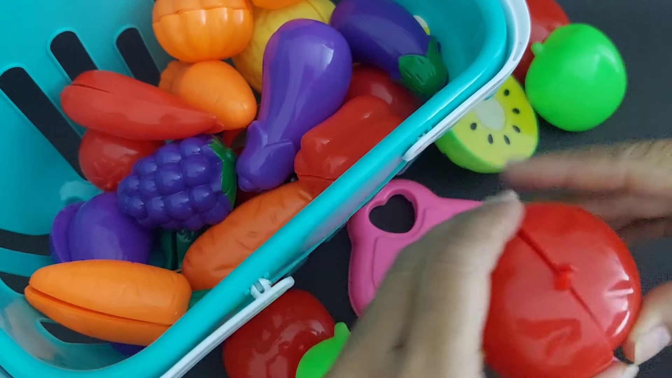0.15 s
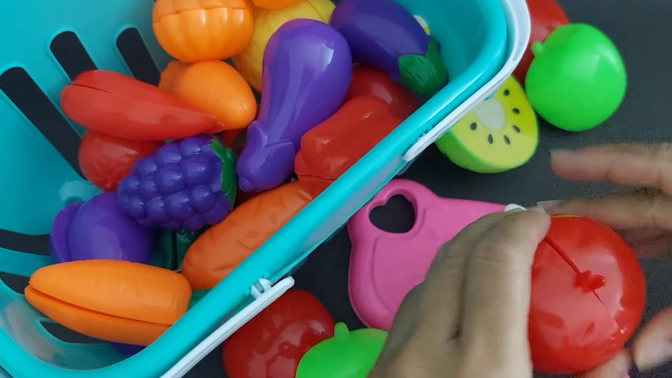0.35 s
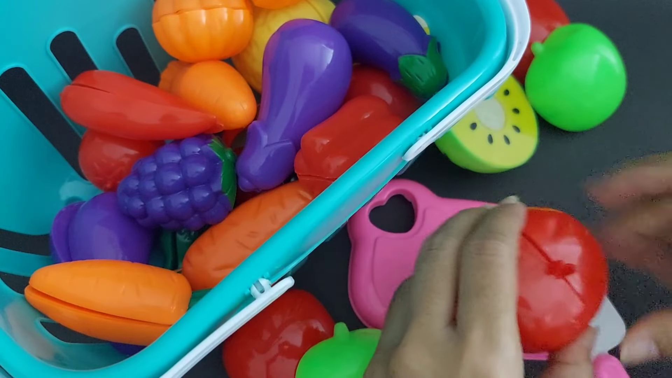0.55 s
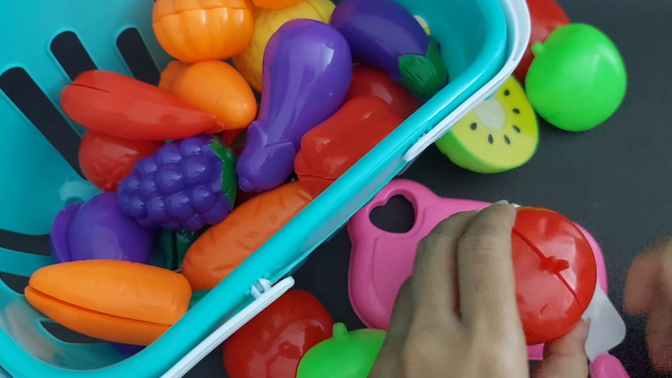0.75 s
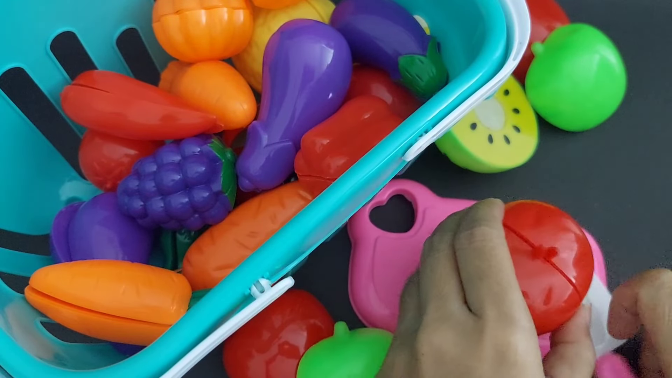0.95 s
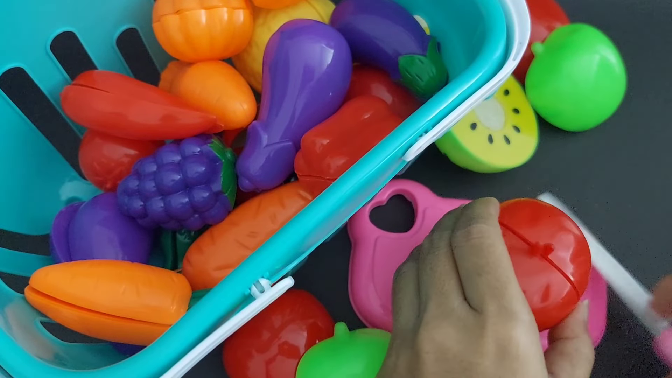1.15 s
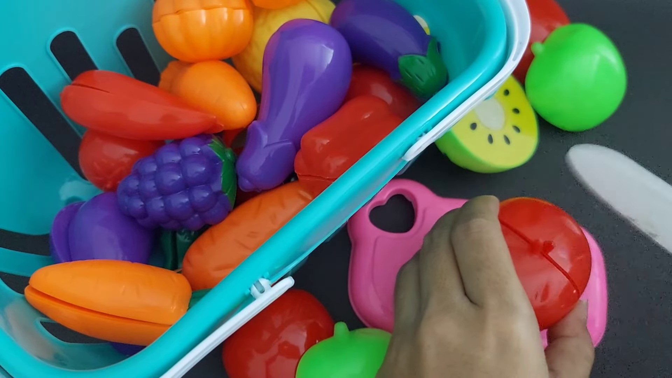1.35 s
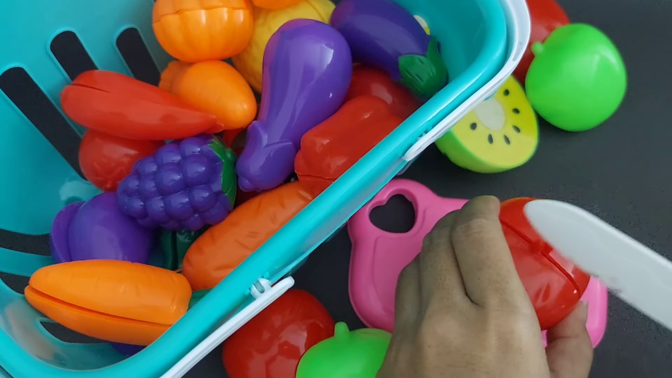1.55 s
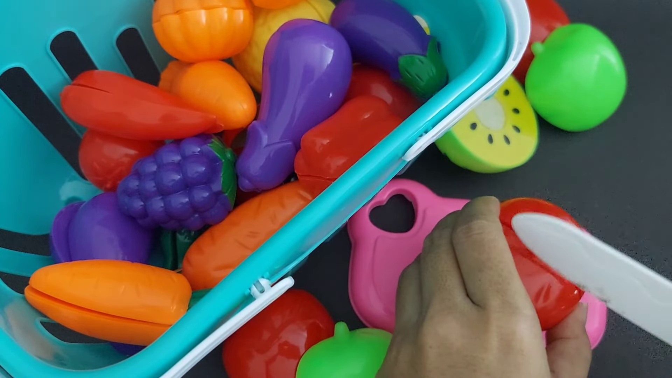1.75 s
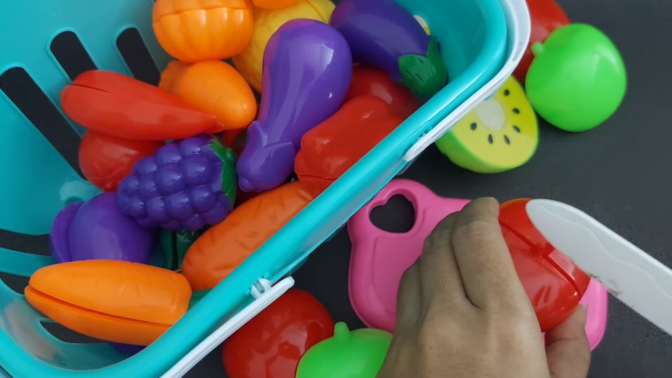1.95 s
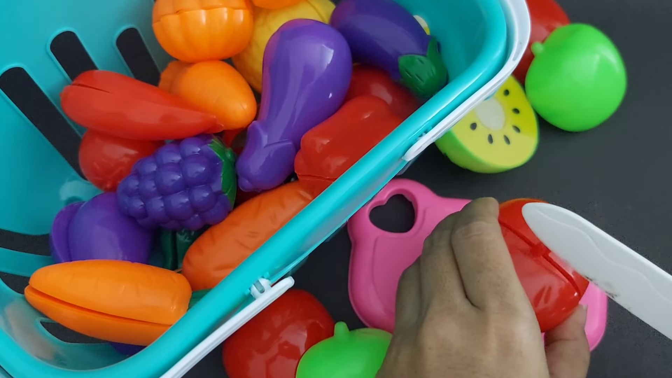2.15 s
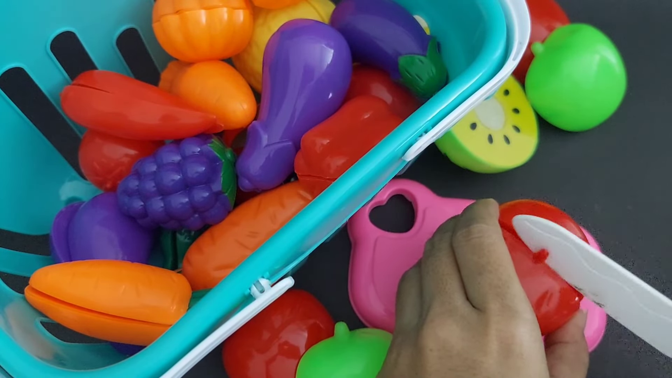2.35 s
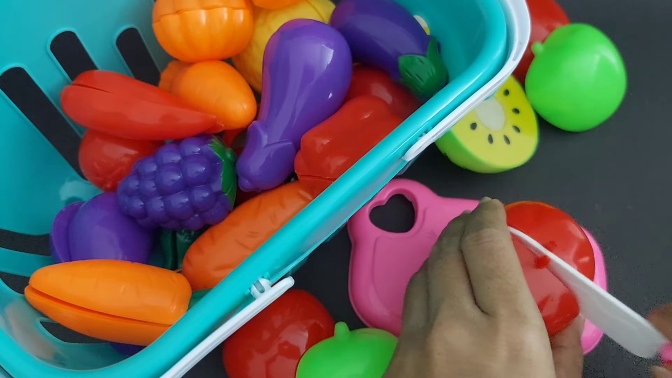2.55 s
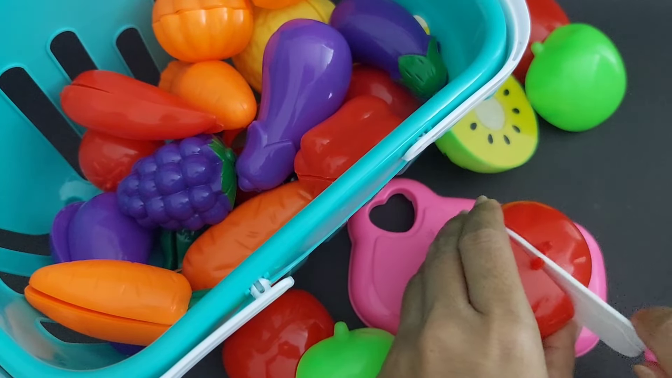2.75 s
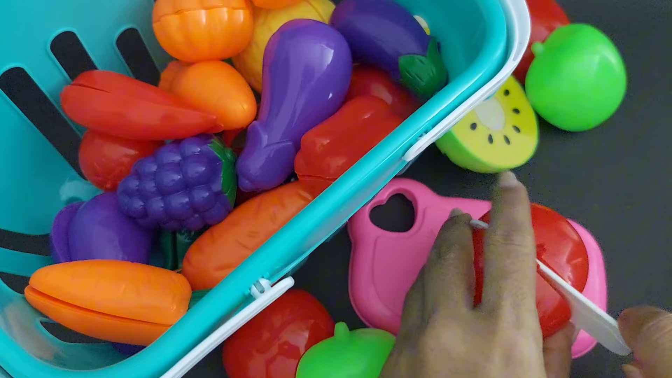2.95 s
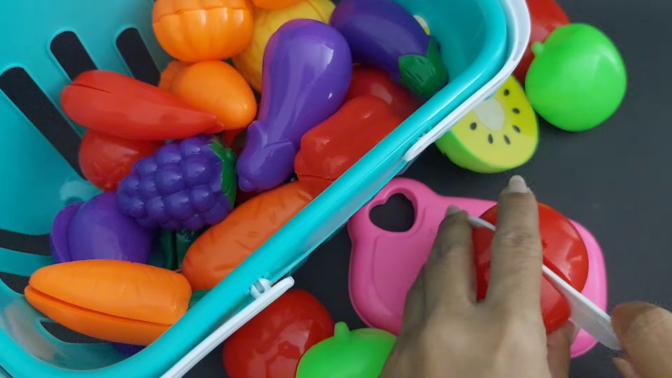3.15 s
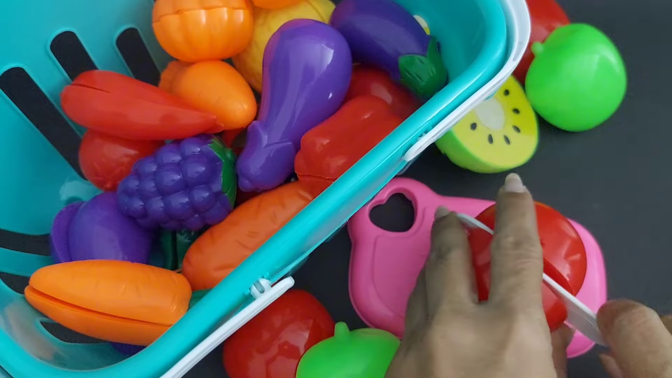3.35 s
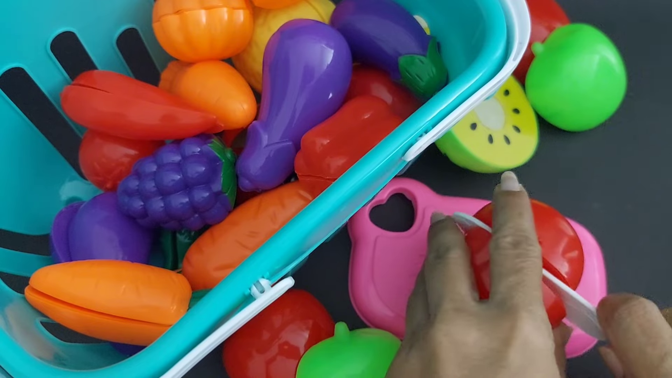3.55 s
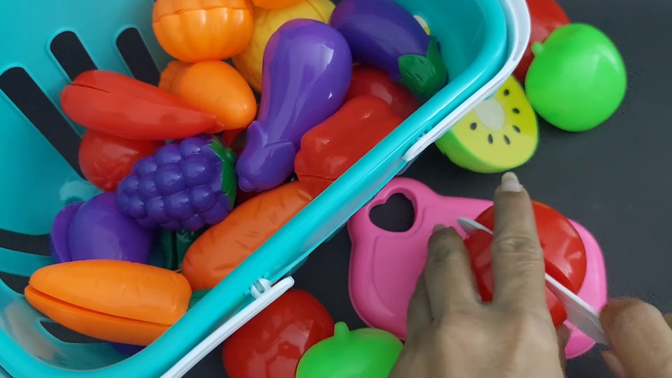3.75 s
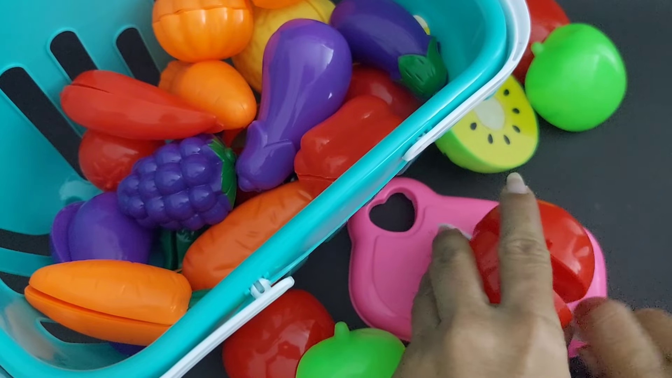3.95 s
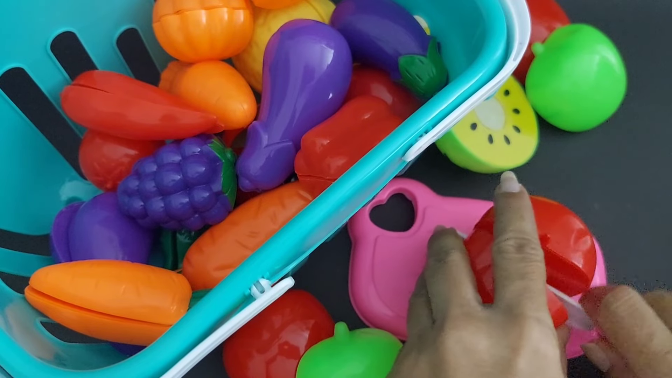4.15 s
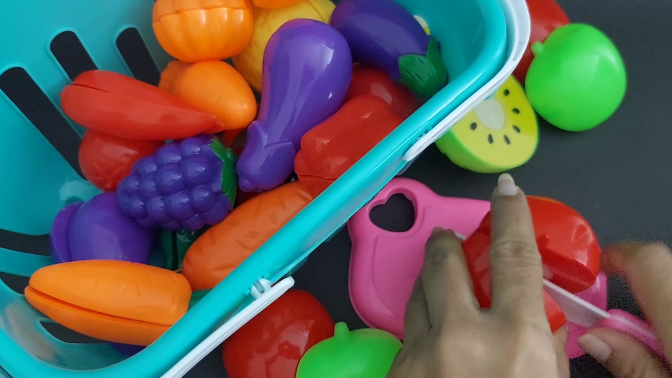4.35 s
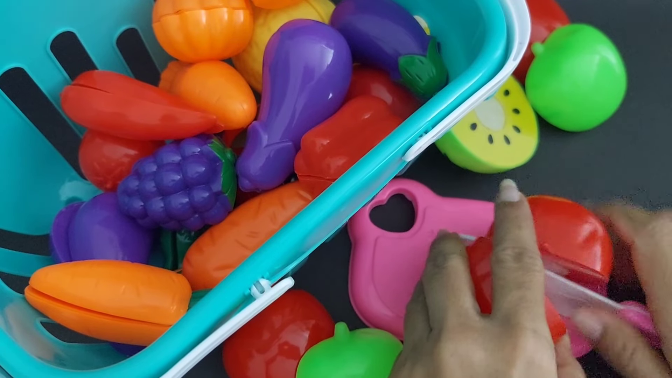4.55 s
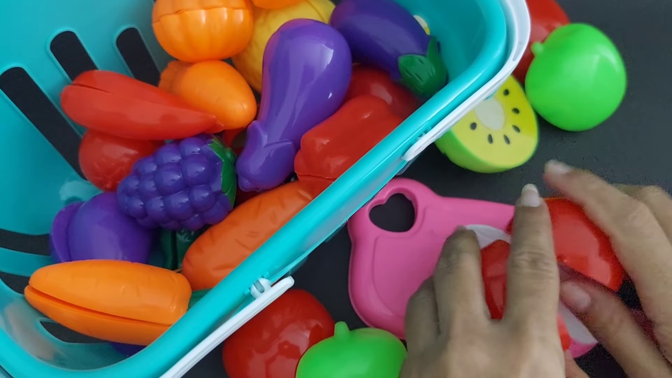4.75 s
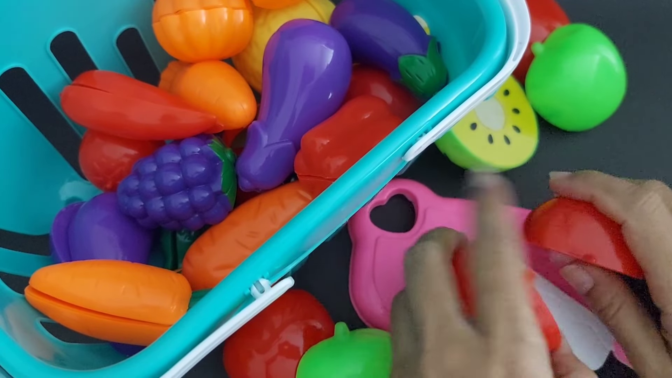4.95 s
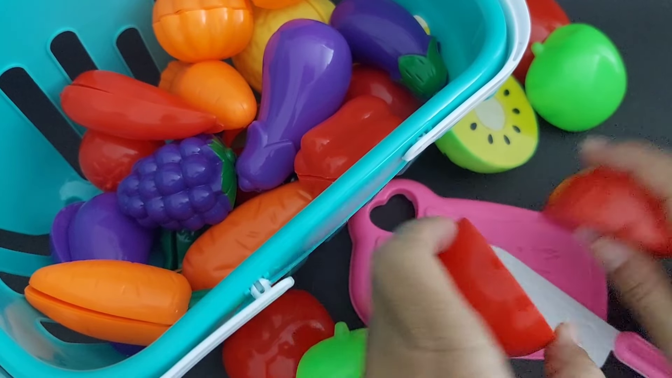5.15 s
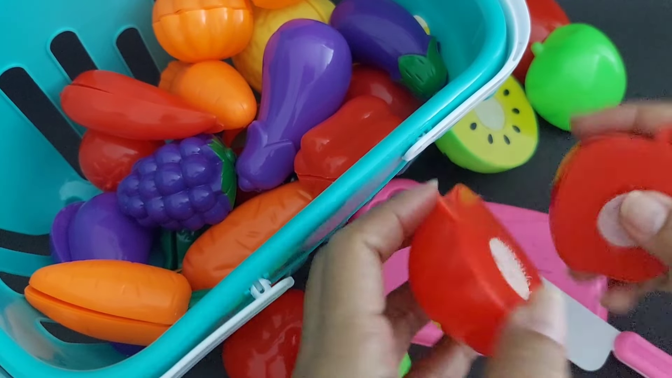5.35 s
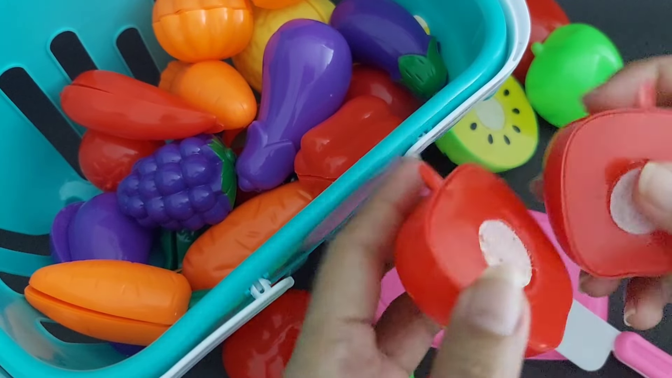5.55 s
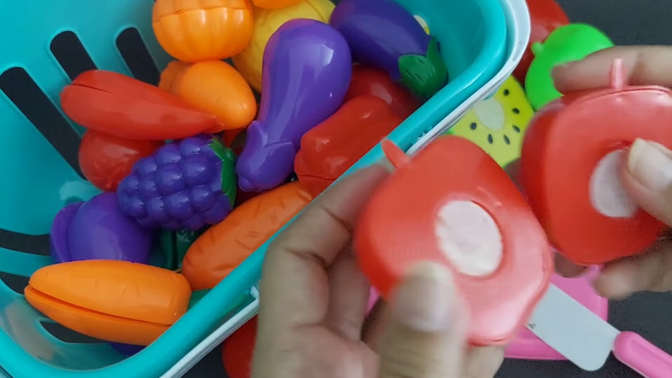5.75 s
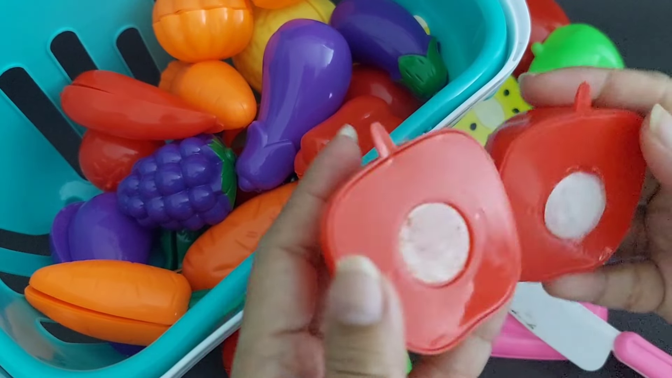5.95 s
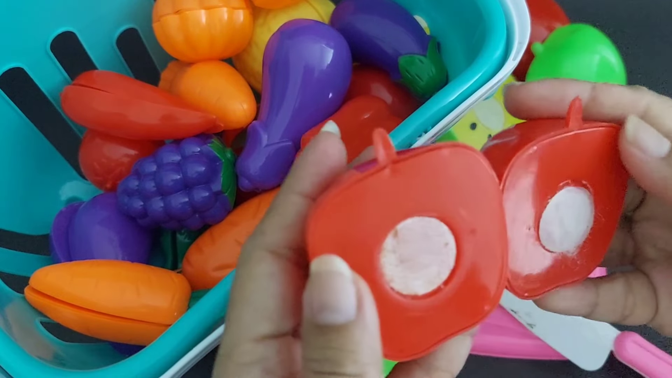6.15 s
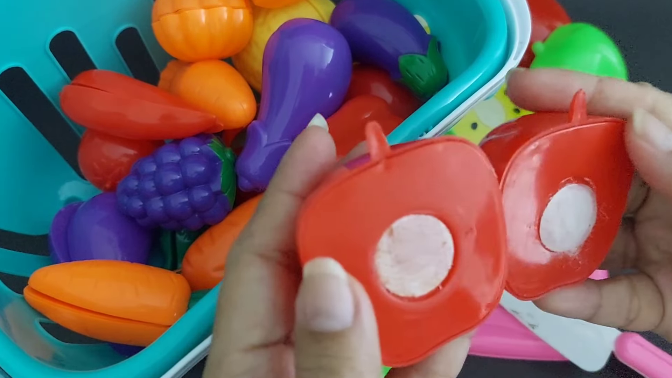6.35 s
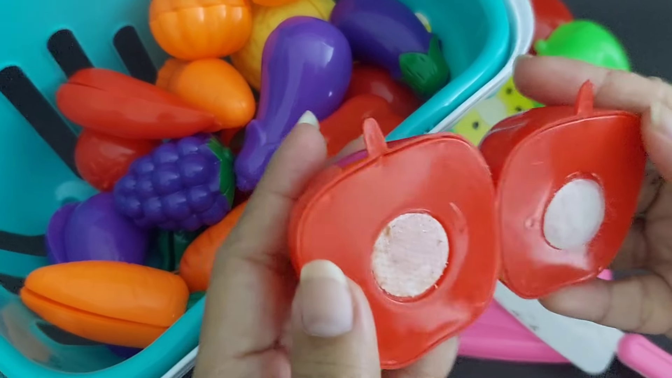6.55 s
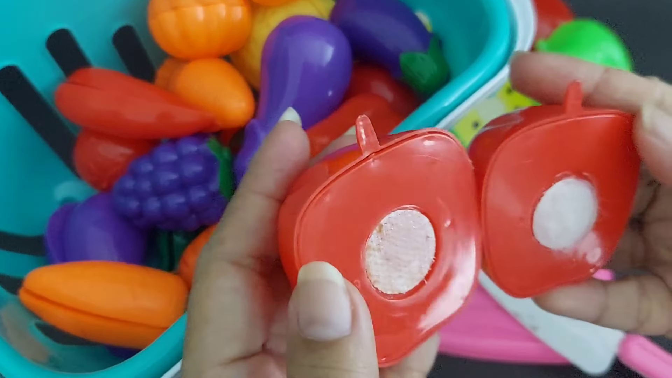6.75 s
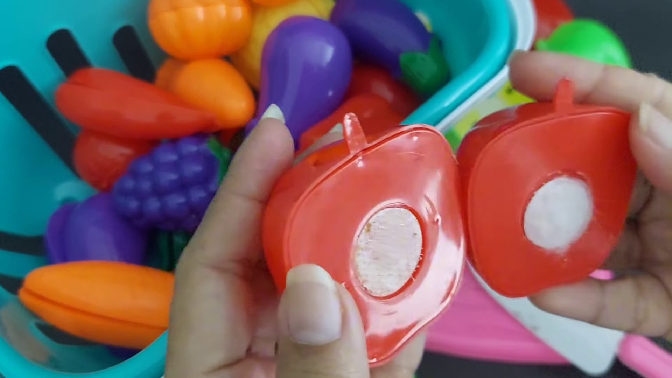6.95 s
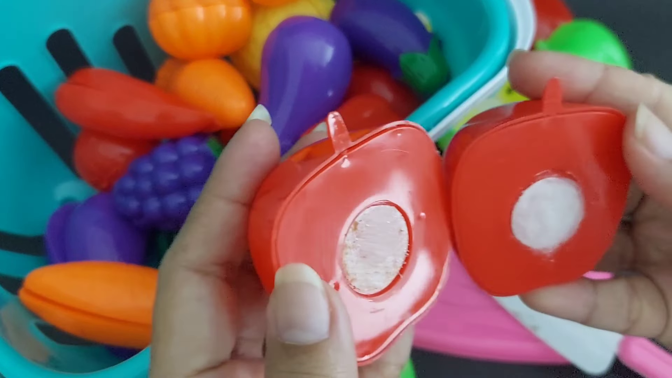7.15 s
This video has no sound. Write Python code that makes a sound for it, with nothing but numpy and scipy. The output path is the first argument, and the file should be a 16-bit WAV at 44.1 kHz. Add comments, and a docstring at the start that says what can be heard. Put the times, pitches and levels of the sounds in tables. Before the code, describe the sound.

Hook-and-loop crackles, then tears apart as a hollow plastic toy fruit is cut, with light taps, skin brushes and knocks on a board.

```python
"""Over the low rumble of a small, live room, skin brushes a hollow plastic toy fruit, close in stereo.
Nails and a plastic knife rasp and tap on its shell; the table booms softly and the fruit scuffs, knocks
and slides on a toy board. From 2.5 s the knife leans on the hook-and-loop patch between the halves,
which lets go hook by hook, then rips open at 3.9 s. A half slides and knocks on the board, the knife
drops near 5 s, and a few light brushes of skin end the scene."""
import sys
import numpy as np
from scipy import signal
from scipy.fft import rfft, irfft, next_fast_len
from scipy.io import wavfile

SR = 44100
rng = np.random.default_rng(int(sys.argv[2]) if len(sys.argv) > 2 else 0)


def wav_out(sig):
    """Save sig, one row per channel (or a flat mono array), as 16-bit PCM at SR to the path in sys.argv[1]."""
    wavfile.write(sys.argv[1], SR, np.round(np.clip(np.atleast_2d(sig).T, -1, 1) * 32767).astype(np.int16))


N = 317512


def from_db(db):
    """Decibels to gain."""
    return 10 ** (np.asarray(db) / 20)


def rms_one(x):
    """Scale to unit rms."""
    return x / np.sqrt(np.mean(x ** 2) + 1e-20)


def swell(peak_s, rise_s, fall_s):
    """A fade up 20 dB over the rise to a peak of 1, down 20 dB over the fall; steeper further out."""
    t = np.arange(N) / SR - peak_s
    away = np.minimum(np.maximum(-t / rise_s, t / fall_s), 10)
    return from_db(-20 * (away + np.maximum(away - 1, 0) ** 2))


def strokes(rows, rise):
    """Envelope of a series of strokes; rise is the share of each length spent swelling."""
    return sum(from_db(db) * swell(s, rise * length, (1 - rise) * length) for s, length, db, *_ in rows)


def at_hz(points, hz):
    """Read a curve on a log-frequency axis."""
    f, value = np.transpose(points)
    return np.interp(np.log(hz + 1e-3), np.log(f), value)


def panned(pan_db):
    """Left and right gains; positive leans left."""
    return rms_one(from_db([[pan_db / 2], [-pan_db / 2]]))


def band(x, low_hz, high_hz, order=3):
    """Causal band-pass."""
    return signal.sosfilt(signal.butter(order, [low_hz, high_hz], "band", fs=SR, output="sos"), x)


def resonate(x, modes):
    """Parallel resonators of alternating polarity."""
    out = 0
    for k, (hz, width, db) in enumerate(modes):
        r = np.exp(-np.pi * width / SR)
        poles = [1, -2 * r * np.cos(2 * np.pi * hz / SR), r * r]
        ring = signal.lfilter([1, 0, -1], poles, x + 1e-18)
        out = out + (-1) ** k * from_db(db) * (1 - r * r) / 2 * ring
    return out


def moving_resonance(x, rows, half_width_hz):
    """One resonance gliding from each stroke's pitch to the next; rms 1."""
    rows = np.array(rows)
    centre_hz = np.interp(np.arange(N) / SR, rows[:, 0], rows[:, -1])
    turn = np.exp(2j * np.pi * np.cumsum(centre_hz) / SR)
    r = np.exp(-2 * np.pi * half_width_hz / SR)
    return rms_one(np.real(turn * signal.lfilter([1], [1, -2 * r, r * r], x / turn + 1e-18)))


def grains(per_s, spread_db, apart):
    """Tiny random releases of uneven size; apart widens the stereo image; rms 1."""
    sizes = from_db(spread_db * np.minimum(rng.exponential(1, N), 3))
    fires = rng.random(N) < per_s / SR
    return rms_one(sizes * fires * (rng.choice([-1, 1], N) + apart * rng.standard_normal((2, N))))


def place(sounds, times):
    """Lay short stereo sounds on the timeline."""
    out = np.zeros((2, N))
    for sound, s in zip(sounds, times):
        at = int(s * SR)
        out[:, at:at + sound.shape[-1]] += sound[:, :N - at]
    return out


# body, treble and crack bands of a hit: low f/Hz, high f/Hz
HIT_BANDS = [(250, 1750), (1750, 6000), (6000, 17000)]
# stereo image of those bands: width/ratio, extra pan/dB
HIT_IMAGE = [(.5, 4), (1.3, 0.5), (2.4, 1)]


def hits(rows, modes, decay, crack, pan_db):
    """Each hit starts all modes with random strengths: a dense burst, then a short ring."""
    times, body_db, treble_db = np.transpose(rows)
    burst_s, ring_db, ring_t60 = decay
    crack_slope, crack_offset_db = crack
    crack_db = crack_slope * treble_db + crack_offset_db
    t = np.arange(SR // 16) / SR
    attack = np.minimum(t / .0005, 1)
    envelope = attack * (np.exp(-(t / burst_s) ** 4) + from_db(ring_db - 60 * t / ring_t60))
    motion = resonate(rng.standard_normal((len(times), 3, 2 * len(t))), modes)[..., len(t):] * envelope
    out = 0
    for edges, rel_db, (apart, lean_db) in zip(HIT_BANDS, (0, treble_db, crack_db), HIT_IMAGE):
        part = band(motion[:, :1] + apart * motion[:, 1:], *edges)
        # a hit's level is its energy spread over 6 ms
        part = part / np.sqrt(np.sum(part ** 2, axis=2, keepdims=True) / (.006 * SR))
        out = out + part * from_db(body_db + rel_db)[:, None, None] * panned(pan_db + lean_db)
    return place(out, times)


# left-right match of diffuse sound: f/Hz, correlation/ratio
CORRELATION = [(50, .7), (130, 1), (300, 0.033), (700, 0.69), (1500, 0), (15000, 0.038)]


def stereo_noise(size):
    """Spectra of two white noises, alike in the bass and wide in the treble."""
    mid, side = rfft(rng.standard_normal((2, size)))
    alike = np.clip(at_hz(CORRELATION, np.arange(len(mid)) * SR / size), -1, 1)
    return np.sqrt(1 + alike) * mid + np.sqrt(1 - alike) * side * [[1], [-1]]


# EQ curves of the room's rumble and the microphone hiss: f/Hz, level/dB
RUMBLE_EQ = [(15, -68.5), (25, -43.5), (53, -17.5), (70, -8), (91, -4.5), (108, -5.5), (139, -5.5),
             (195, -16), (227, -15.5), (314, -26), (1000, -45), (1300, -66), (2200, -120)]
HISS_EQ = [(590, -33), (1000, -7), (1200, -8), (1450, -6.5), (1810, -10.5), (2530, -11), (2910, -15),
           (4210, -15.5), (5700, -15), (7980, -4), (9280, -14), (13800, -15), (16000, -22.5)]


def room_tone():
    """A steady bed of coloured noise: rumble leaning left, faint hiss near the centre."""
    size = next_fast_len(N)
    hz = np.arange(size // 2 + 1) * SR / size
    bed = 0
    for eq, db, pan_db in (RUMBLE_EQ, -64.5, 9), (HISS_EQ, -81, -1):
        inside = (hz >= eq[0][0]) & (hz <= eq[-1][0])
        noise = irfft(stereo_noise(size) * from_db(at_hz(eq, hz)) * inside, size)[:, :N]
        bed = bed + from_db(db) * rms_one(noise) * panned(pan_db)
    return bed


# skin strokes: peak t/s, length/s, level/dB
SKIN_STROKES = [(.09, 0.33, -62.5), (.28, 0.099, -54.5), (.66, 0.64, -80), (.93, 0.1, -66.5),
                (1.07, 0.3, -59.5), (1.25, 0.48, -73.5), (1.92, 0.23, -71), (2.34, 0.19, -58.5),
                (4.76, 0.67, -69), (4.972, 0.064, -41), (5.29, .11, -63), (5.42, 0.18, -76.5),
                (5.62, 0.26, -81), (5.82, 0.11, -65), (6.1, 0.29, -82)]


def skin_brush():
    """Skin brushes the plastic: dense friction grains blur into a wide hiss."""
    hiss = band(grains(per_s=15000, spread_db=2.5, apart=4), 1308, 12950, order=1)
    return strokes(SKIN_STROKES, rise=.55) * rms_one(hiss) * panned(-3.5)


# drags of a thin edge: peak t/s, length/s, level/dB, f/Hz
EDGE_DRAGS = [(0.112, 0.11, -67.5, 4400), (0.271, 0.11, -55, 4200), (.95, 0.13, -68, 4730),
              (1.175, 0.059, -64, 5000), (1.252, 0.12, -66, 5000), (1.38, .13, -77, 4930),
              (1.79, 0.19, -78, 4200), (1.93, 0.1, -69.5, 4340), (2.338, .12, -55.5, 4500)]


def edge_rasp():
    """A thin edge catches and slips over plastic in a bright, pitched rasp."""
    catches = grains(per_s=4000, spread_db=3, apart=1.5)
    rasp = moving_resonance(catches, EDGE_DRAGS, half_width_hz=480)
    return strokes(EDGE_DRAGS, rise=.59) * rasp * panned(-5)


# touches on the fruit: t/s, level/dB, treble re body/dB
SHELL_TAPS = [(0.1543, -55.5, 9), (0.1688, -65, 10), (0.2225, -56.5, 11.5), (0.2702, -54, 5.5),
              (0.5453, -72, 1.5), (1.6225, -51, -13), (1.7003, -72.5, 7.5), (2.0818, -57, -6.5),
              (2.2709, -45.5, 4), (2.3353, -54.5, -3), (2.3876, -61, -8), (2.5218, -40.5, -7),
              (4.4765, -44.5, -15)]
# modes of its tapped wall: f/Hz, width/Hz, level/dB
WALL_MODES = [(490, 110, -17.5), (730, 100, -10), (940, 120, -7), (1260, 160, -3), (1390, 100, 0),
              (1870, 570, -14), (2750, 320, -15.5), (4190, 150, 1.5), (5440, 2200, -12),
              (9200, 3600, -12.5), (12700, 3000, -13.5)]


def shell_taps():
    """Fingernails and knife tick on the fruit and its wall rings briefly."""
    return hits(SHELL_TAPS, WALL_MODES, decay=(.003, -5, .05), crack=(1.13, -2.4), pan_db=-4.5)


# pushes that reach the table: t/s, level/dB
TABLE_PUSHES = [(0.894, -58), (1.631, -61), (2.31, -55), (2.523, -51), (2.592, -55.5), (3.318, -48),
                (3.915, -39.5), (3.955, -37), (4.503, -46), (4.764, -49), (4.963, -43), (4.995, -43.5),
                (5.914, -61.5)]
# low modes of the table: f/Hz, width/Hz, level/dB
TABLE_MODES = [(72, 14, -16), (96, 14, -9), (129, 7, 0), (156, 6, 1), (235, 50, -21), (330, 90, -29)]


def table_booms(push_t60=.036, nudge_count=10, nudge_until_s=3.2, nudge_db=-63):
    """Soft pushes and chance nudges of the hands set the table booming."""
    nudges = [(nudge_until_s * (k + rng.random()) / nudge_count, nudge_db) for k in range(nudge_count)]
    times, db = np.transpose(list(TABLE_PUSHES) + nudges)
    t = np.arange(SR // 2) / SR
    force = rng.standard_normal((len(times), 1, len(t))) * from_db(-60 * t / push_t60)
    booms = resonate(force, TABLE_MODES)
    onset_rms = np.sqrt(np.mean(booms[..., :SR // 20] ** 2, axis=(1, 2)))
    return place(booms * (from_db(db) / onset_rms)[:, None, None], times) * panned(2)


# shifts of the held fruit: peak t/s, length/s, level/dB
FRUIT_SHIFTS = [(.7, 0.32, -73), (.91, 0.23, -63.5), (2.58, 0.43, -62), (2.95, .4, -68.5),
                (3.33, 0.26, -53), (4.53, 0.26, -55), (4.77, .15, -49)]


def fruit_scuff():
    """The held fruit shifts on the board with a low, grainy scuff."""
    scuff = band(grains(per_s=1100, spread_db=5, apart=.32), 182.9, 570, order=2)
    return strokes(FRUIT_SHIFTS, rise=.3) * rms_one(scuff)


# landings on the board: t/s, level/dB, treble re body/dB
BOARD_KNOCKS = [(0.8857, -52, -3.5), (0.8949, -45, -12), (1.0138, -48.5, -3.5), (1.0848, -47, -15),
                (4.7448, -32, -16.5), (4.7615, -22, -15.5), (4.7742, -30.5, -13.5), (4.9298, -38.5, -13.5),
                (4.96, -22.5, -4.5), (4.9744, -37, -6), (4.9946, -31, -12.5)]
# modes of the board: f/Hz, width/Hz, level/dB
BOARD_MODES = [(329.3, 120, -14), (535, 81, -16.5), (650, 140, -8.5), (825, 180, -7.5), (1065, 150, 1),
               (1196.5, 120, 0.5), (1410, 140, -6.5), (2240, 310, -10), (2790, 410, -15.5),
               (4100, 1500, -24), (8600, 5700, -29), (12430, 4400, -29)]


def board_knocks():
    """Knife and fruit strike the board, which answers with a short, dull clack."""
    return hits(BOARD_KNOCKS, BOARD_MODES, decay=(.004, -12, .035), crack=(2.23, 0), pan_db=-3)


# plastic on plastic, the last row a faint finger rub: peak t/s, length/s, level/dB, board scrape re level/dB,
# hollow resonance f/Hz
SLIDES = [(0.913, 0.06, -60, 5, 1270), (1.08, 0.15, -55.5, 4, 1165), (1.635, 0.032, -56.5, -15, 1200),
          (2.043, 0.039, -59.5, -9, 1186), (2.086, .06, -67, -5, 1280), (2.385, .07, -65.5, 5, 1400),
          (4.53, 0.091, -59, -1.5, 1350), (4.693, 0.27, -41, -11, 1211), (4.753, 0.053, -28.5, -9, 1171),
          (4.968, .045, -30.5, -2, 1255), (5.004, 0.045, -39.5, -0.5, 1060), (5.826, .13, -80.5, -12, 1700)]


def plastic_slide(rise=.54):
    """Dull stick-slip drives both a gliding hollow resonance and the board's modes."""
    slips = grains(per_s=1100, spread_db=-.5, apart=.5)
    hollow = moving_resonance(slips, SLIDES, half_width_hz=117)
    board = rms_one(band(resonate(slips, BOARD_MODES), 400, 2700, order=2))
    scrapes = [(s, length, db + board_db) for s, length, db, board_db, _ in SLIDES]
    return (strokes(SLIDES, rise) * hollow + strokes(scrapes, rise) * board) * panned(-3.5)


STRAIN_START_S, RIP_START_S, RIP_END_S = 2.52, 3.8775, 3.956
# pushes of the knife on the patch: peak t/s, level/dB
KNIFE_PUSHES = [(2.654, -40.5), (2.812, -41.5), (2.931, -51.5), (3.2, -48), (3.29, -36.5), (3.34, -37.5),
                (3.719, -52), (3.87, -38)]
# modes of the closed shell: f/Hz, width/Hz, level/dB
CLOSED_MODES = [(680, 81, -1.5), (920, 290, -3), (1253, 140, 2), (1397.5, 63, 7), (1880, 57, -1.5),
                (2150, 380, -4.5), (2817, 440, -6), (4375, 450, -0.5), (7560, 950, -12), (9300, 1200, -11),
                (12100, 3000, -11), (14550, 1800, -9.5)]


def patch_strain(steady_db=-64.5, push_s=.087, bunches_per_s=100, bunch_s=.001):
    """The knife leans on the patch: a fine crackle in the closed shell swells with each push."""
    t = np.arange(N) / SR
    pushes = strokes([(s, push_s, db) for s, db in KNIFE_PUSHES], rise=.52)
    strain = (from_db(steady_db) + pushes) * (t > STRAIN_START_S) * (t < RIP_START_S)
    crackle = rms_one(resonate(grains(per_s=2500, spread_db=-2, apart=1.2), CLOSED_MODES))
    # neighbouring hooks give way together in brief bunches
    starts = rng.random(N) < bunches_per_s / SR
    bunches = signal.lfilter([1], [1, -np.exp(-2 / (bunch_s * SR))], starts + 1e-18)
    return strain * crackle * rms_one(np.sqrt(.1 + bunches)) * panned(-2.5)


HOOK_DECAY, HOOK_CRACK = (.003, -5, .03), (1.2, -4)
# hooks snapping free: t/s, level/dB
HOOK_SNAPS = [(2.5926, -43.5), (2.6287, -49), (2.6528, -44), (2.747, -43.5), (2.7817, -49.5),
              (2.7978, -42.5), (2.8161, -43), (2.8825, -53), (2.9273, -54), (2.9379, -50.5),
              (3.0169, -45.5), (3.089, -52.5), (3.1235, -47), (3.164, -37), (3.1844, -30), (3.256, -35),
              (3.2718, -33), (3.3215, -32), (3.3295, -27.5), (3.3696, -42), (3.5178, -42), (3.5292, -41.5),
              (3.5791, -43), (3.693, -42.5), (3.7257, -50.5), (3.7915, -39.5), (3.7952, -35), (3.8503, -30)]


def hook_snaps(faint_count=14, faint_db=-57, usual_db=-40.5, treble_db=2, dulling=.12):
    """Hooks snap free in the closed shell, with faint ones at random; bigger snaps sound duller."""
    faint = [(rng.uniform(STRAIN_START_S, RIP_START_S), rng.normal(faint_db, 3))
             for _ in range(faint_count)]
    snaps = [(s, db, treble_db - dulling * (db - usual_db)) for s, db in list(HOOK_SNAPS) + faint]
    return hits(snaps, CLOSED_MODES, HOOK_DECAY, HOOK_CRACK, pan_db=-4)


# modes of the opening shell: f/Hz, width/Hz, level/dB
OPENING_MODES = [(300, 140, -11.5), (472, 110, -11.5), (654, 96, -2), (847, 190, -1.5), (959, 99, 3),
                 (1290, 250, 0), (1430, 180, -1), (2150, 330, -5.5), (2510, 340, -7), (2880, 110, -5.5),
                 (4550, 640, -10.5), (6900, 1300, -17), (12600, 4500, -18.5)]


def patch_rip(row_count=8, row_db=-26, treble_db=-2, jitter_s=.001, crackle_db=-19):
    """Rows of hooks tear at near-even steps inside a dense crackle that grows until the halves part."""
    times = np.linspace(RIP_START_S, RIP_END_S, row_count) + jitter_s * rng.standard_normal(row_count)
    rows = [(s, row_db, treble_db) for s in times]
    tears = hits(rows, OPENING_MODES, HOOK_DECAY, HOOK_CRACK, pan_db=-3.5)
    pull = swell(RIP_END_S, rise_s=.16, fall_s=.026) * (np.arange(N) / SR > RIP_START_S)
    crackle = rms_one(resonate(grains(per_s=9200, spread_db=2.5, apart=1), OPENING_MODES))
    return tears + from_db(crackle_db) * pull * crackle * panned(-2)


# reverb decay: f/Hz, T60/s
REVERB_DECAY = [(150, 0.39), (400, 0.29), (800, 0.46), (1500, 0.43), (4000, 0.5), (8000, 0.49),
                (15000, 0.35)]
# reverb return: f/Hz, level re direct/dB
REVERB_EQ = [(150, -6.5), (380, -9), (600, -7), (850, -4), (1300, -8.5), (2300, -5.5), (4500, -9),
             (8000, -7.5), (15000, -9)]
# narrow resonances of the surroundings: f/Hz, width/Hz, level/dB
RINGING_MODES = [(472, 7, -2), (637, 6, 2), (707, 7, 0), (813, 6, 3), (1008, 7, -2), (1172, 6, 0),
                 (1345, 5.5, -2), (1443, 6, -2), (2166, 6, 2), (2418, 6, 3), (2921, 7, 1)]


def room(x, predelay_s=.006, build_s=.006):
    """A diffuse tail builds after the first echo and dies band by band, while narrow modes ring on."""
    size = SR * 3 // 4
    t, hz = np.arange(size) / SR, np.arange(size // 2 + 1) * SR / size
    onset = 1 - np.exp(-np.maximum(t - predelay_s, 0) / build_s)
    noise, response = stereo_noise(size), 0
    edges = np.geomspace(90, 18000, 17)
    for low, high in zip(edges, edges[1:]):
        centre_hz = np.sqrt(low * high)
        decay = from_db(-60 * t / at_hz(REVERB_DECAY, centre_hz))
        tail = irfft(noise * ((hz >= low) & (hz < high)), size) * onset * decay
        unity_tail = rms_one(tail) * np.sqrt(2 * (high - low) / SR / size)
        response = response + unity_tail * from_db(at_hz(REVERB_EQ, centre_hz))
    return signal.fftconvolve(x, response, axes=1)[:, :N] + resonate(x, RINGING_MODES)


def scene():
    """Toys and table in the room, over the room tone."""
    patch = patch_strain() + hook_snaps() + patch_rip()
    impacts = shell_taps() + table_booms() + board_knocks()
    friction = skin_brush() + edge_rasp() + fruit_scuff() + plastic_slide()
    left, right = patch + impacts + friction
    toys = np.stack([np.roll(left, 1), right])   # the fruit lies a little nearer the right microphone
    return toys + room(toys) + room_tone()


def record(dry):
    """A steep high cut at 16 kHz."""
    return signal.sosfilt(signal.ellip(10, .1, 80, 16000, fs=SR, output="sos"), dry)


dry = scene()
out = record(dry)
wav_out(out)
```